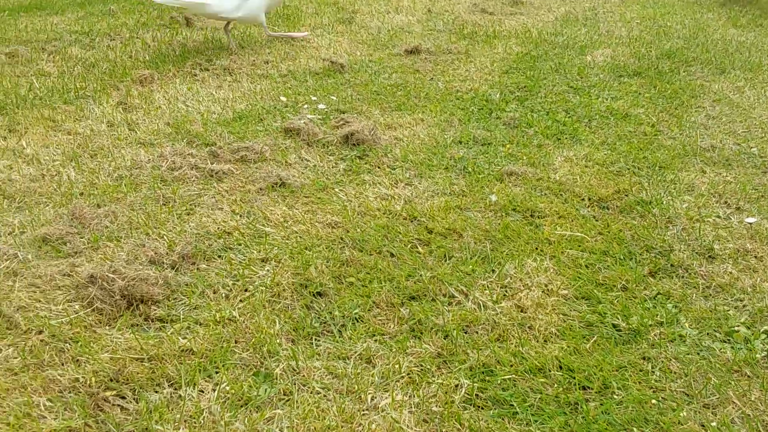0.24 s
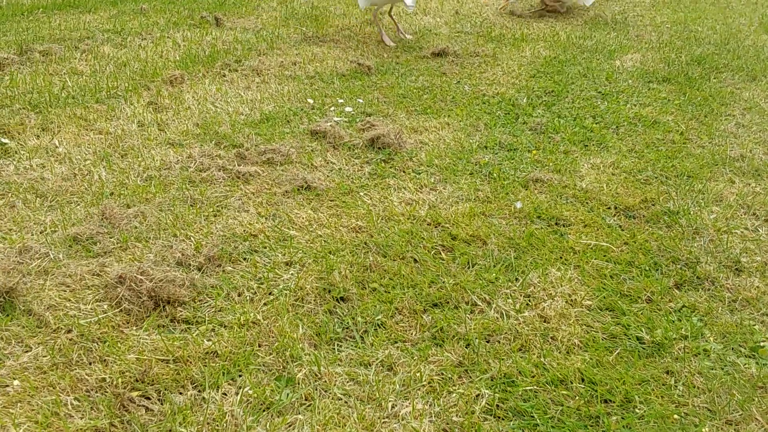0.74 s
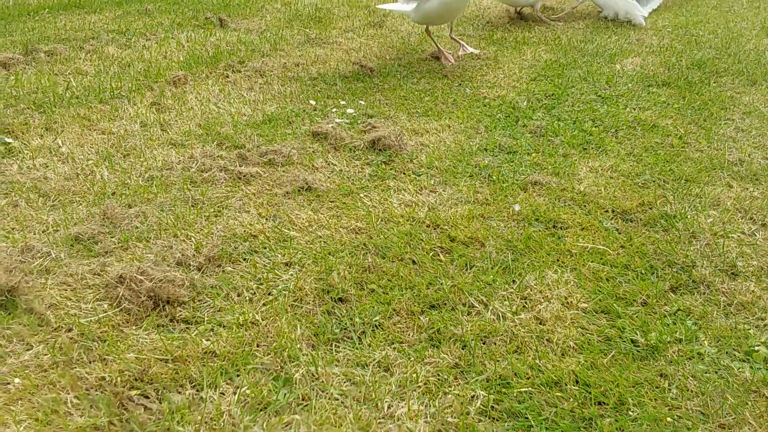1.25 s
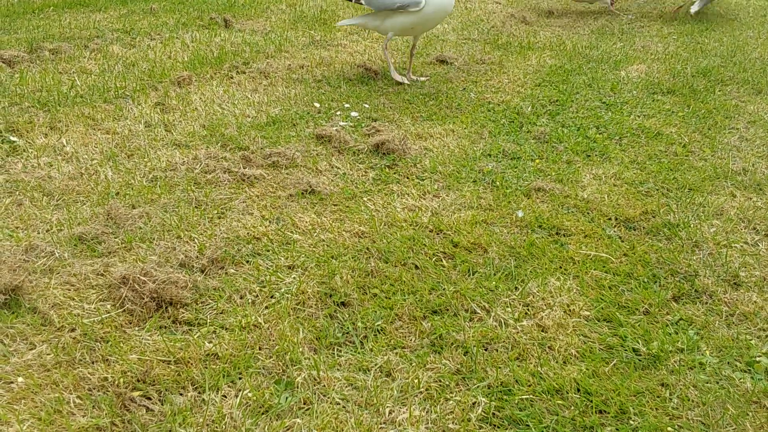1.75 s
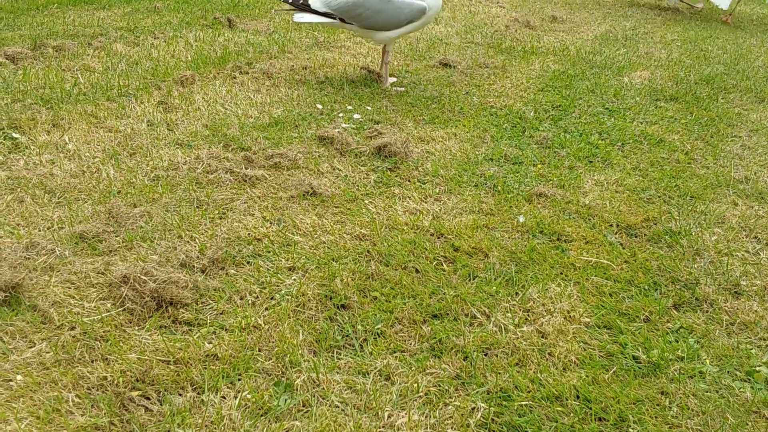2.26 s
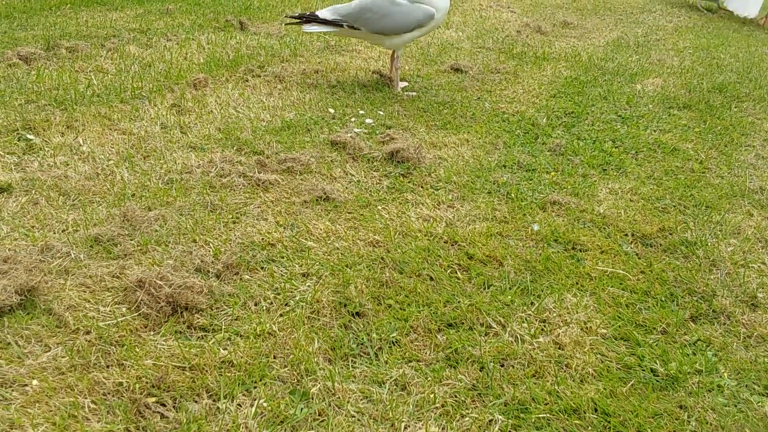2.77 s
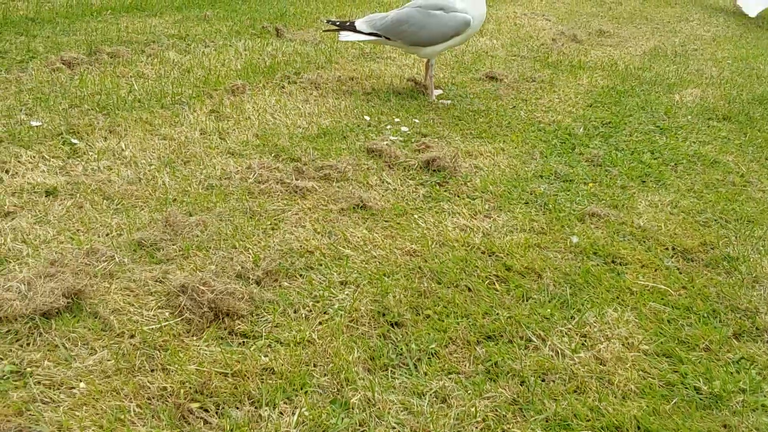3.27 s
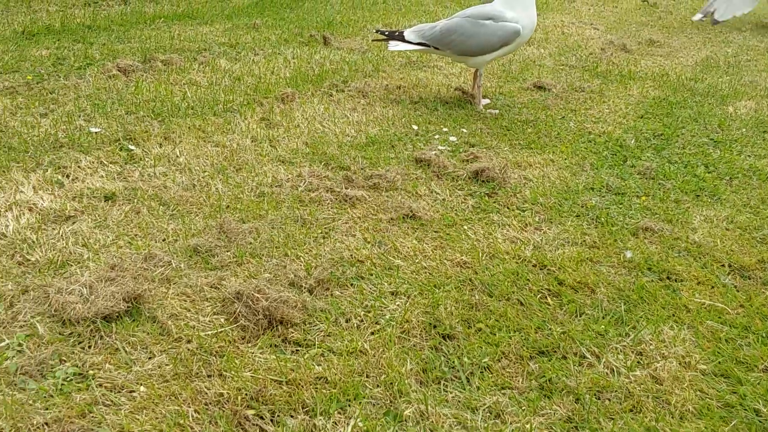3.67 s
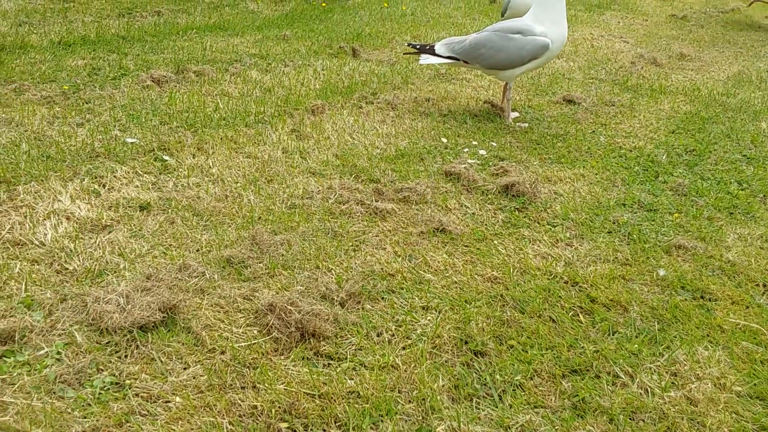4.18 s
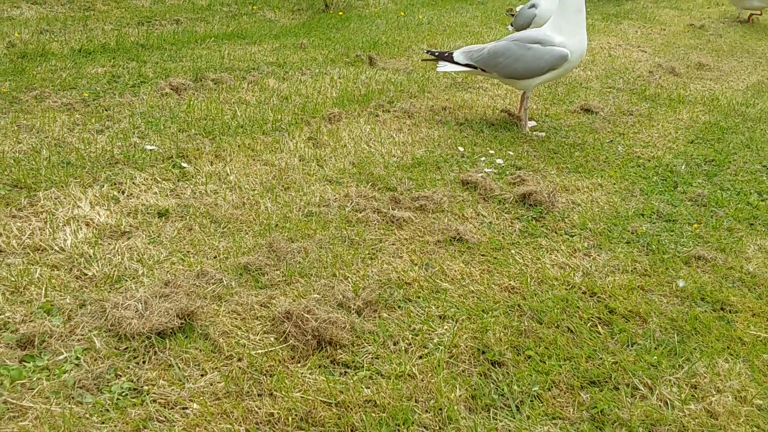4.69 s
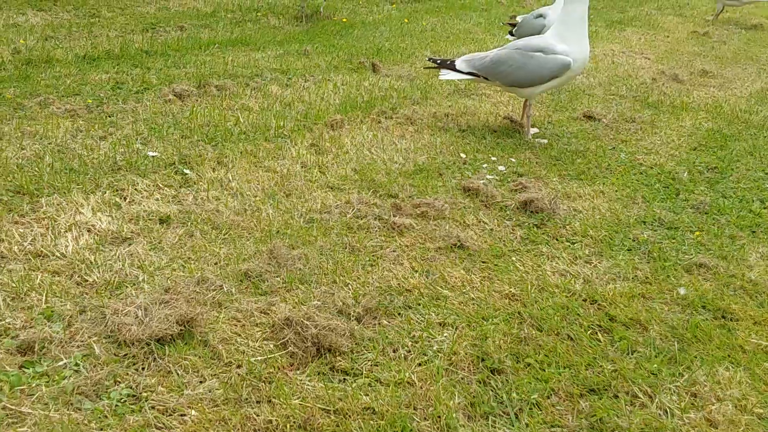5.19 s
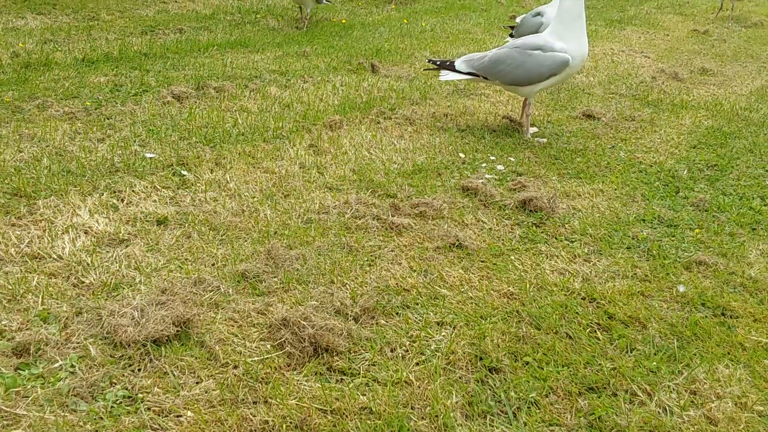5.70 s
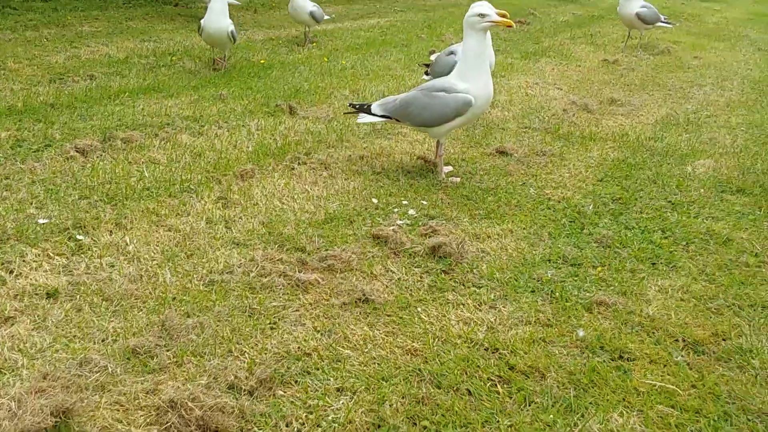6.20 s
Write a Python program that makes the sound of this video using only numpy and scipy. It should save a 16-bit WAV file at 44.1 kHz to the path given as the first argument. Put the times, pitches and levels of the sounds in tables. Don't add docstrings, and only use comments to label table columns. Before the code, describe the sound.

On an open lawn beside a hard wall, soft wing flaps and a faint distant hum lead into a close gull's bright, falling yelps. A second gull answers hoarsely, and others call far off. Breathier wing bursts follow before the fourth cry. Wind then thuds into the handheld stereo microphone, one last near cry rings out, and the scene quiets to a tiny low moan.

```python
import sys
import numpy as np
from scipy import signal
from scipy.fft import rfft, irfft, next_fast_len
from scipy.io import wavfile
from scipy.ndimage import uniform_filter1d

SR = 44100
rng = np.random.default_rng(int(sys.argv[2]) if len(sys.argv) > 2 else 0)


def makeup_ratio(level_db):
    decades = np.asarray(level_db, float) / 20
    return 10 ** decades


def inscribe(sig):
    pcm = np.round(np.clip(np.atleast_2d(sig).T, -1, 1) * 32767)
    wavfile.write(sys.argv[1], SR, pcm.astype(np.int16))


N = 284312
EDGE_HZ = 15900

# (time [s], level [dB], left-right difference [dB])
BREEZE = [(0, -65.5, -4), (1.13, -60.5, 2), (1.63, -54, -6), (2.14, -58.5, -2.5), (3.98, -52, 2),
          (4.2, -50, 1), (4.45, -29, -4), (5.0, -43, 13.5), (5.13, -43, 8), (5.3, -48, 17),
          (5.6, -63.5, 13), (5.89, -83.5, 27), (6.15, -68.5, 6.5), (6.45, -64, 25)]


def evened(x):
    return x / np.sqrt(np.mean(x ** 2, axis=-1, keepdims=True) + 1e-20)


def read(points, hz):
    f, value = np.transpose(points)
    return np.interp(np.log(hz + 1), np.log(f + 1), value)


def curves(rows, t):
    s, *columns = np.transpose(rows)
    return [np.interp(t, s, c) for c in columns]


def add(mix, s, sound):
    part = mix[..., round(s * SR):][..., :sound.shape[-1]]
    part += sound[..., :part.shape[-1]]


def coloured(x, spectrum, lag_ms=0.):
    size = next_fast_len(N + 4096)
    hz = np.fft.rfftfreq(size, 1 / SR)
    delay = np.exp(-2j * np.pi * hz * lag_ms / 1000)
    return irfft(rfft(x, size) * makeup_ratio(read(spectrum, hz)) * delay, size)[..., :N]


def pair(spectrum, same, patchy_db, band):
    left_lag_ms = .5
    a, b = rng.standard_normal((2, N))
    left = np.roll(a, round(left_lag_ms * SR / 1000))
    same = np.clip(same, 0, 1)
    right = same * a + np.sqrt(1 - same ** 2) * b
    hz, t, z = signal.stft(np.array([left, right]), SR, nperseg=512)
    patches = rng.standard_normal(z.shape[:0:-1])
    patches = uniform_filter1d(uniform_filter1d(patches, 6, 0), 12, 1).T
    patchy = signal.istft(z * makeup_ratio(patchy_db * patches / patches.std()), SR, nperseg=512)[1]
    x = coloured(patchy, spectrum)
    inside = signal.sosfilt(signal.butter(4, band, "bandpass", fs=SR, output="sos"), x)
    return x / inside.std()


def rustle(depth_db):
    return makeup_ratio(depth_db * evened(uniform_filter1d(rng.standard_normal(N), 160)))


def air():
    # (time [s], air hiss level [dB])
    background_level = [(0, -62), (.55, -61), (1.1, -64.5), (2, -61), (3.1, -61.5), (3.4, -60.5), (3.75, -56.5),
                        (4.15, -64.5), (5.15, -63), (5.5, -67), (5.8, -76.5), (6.25, -73), (6.447, -68)]
    # (frequency [Hz], density [dB per Hz])
    hiss_spectrum = [(530, -28.5), (900, 7), (1440, 0), (2360, 2), (4100, -1), (7680, 1.5), (10200, -4),
                     (15100, -0.5), (16000, 0)]
    # (frequency [Hz], density [dB per Hz])
    hum_spectrum = [(12, -58), (20, -51.5), (36, -32), (85, 1.5), (124, -2.5), (172, -3), (424, -16.5),
                    (498, -13.5), (742, -14), (1500, -33), (1950, -58), (3300, -120)]
    base_db, follows, usual_hiss_db, wind_mask = -58, 1.5, -63, 0.35
    t = np.arange(N) / SR
    hiss_db, = curves(background_level, t)
    strong_wind_db = np.maximum(curves(BREEZE, t)[0] + 48, 0)
    hum_db = base_db + follows * np.minimum(hiss_db - usual_hiss_db, 3) - wind_mask * strong_wind_db
    hiss = rustle(1.2) * pair(hiss_spectrum, .4, 1.2, (9000, 15000))
    return makeup_ratio(hiss_db) * hiss + makeup_ratio(hum_db) * pair(hum_spectrum, 0.95, 5.0, (250, 900))


def gust():
    # (time [s], level [dB], left-right difference [dB], length [s])
    buffets = [
        (1.286, -50, 8, 0.046),
        (4.287, -40, 10, 0.019),
        (4.427, -27.5, -5, 0.01),
        (4.511, -25, 11, 0.011),
        (4.622, -30, -4, 0.042),
        (4.73, -33, 8, 0.02),
        (4.812, -33.5, -14, 0.045),
        (4.899, -27.5, 0.5, 0.048),
        (5.02, -33.5, -8.5, 0.065),
        (5.185, -37, -1, 0.017),
    ]
    # (frequency [Hz], density [dB])
    rumble = [(12, -65.5), (20, -17.5), (48, 5.5), (85, 5.5), (232, -19), (264, -23), (393, -34.5),
              (576, -44.5), (780, -45), (900, -50), (1170, -101), (1980, -120)]
    t, side = np.arange(N) / SR, np.array([[.5], [-.5]])
    level_db, pan_db = curves(BREEZE, t)
    strength = makeup_ratio(level_db + side * pan_db)
    for s, db, lean_db, length in buffets:
        bump = np.exp(-((t - s) / length) ** 2)
        strength = strength + makeup_ratio(db + side * np.clip(lean_db, -9, 9)) * bump
    lumps = evened(uniform_filter1d(uniform_filter1d(rng.standard_normal((2, N)), 600), 600))
    noise = evened(coloured(rng.standard_normal((2, N)) * makeup_ratio(1.2 * lumps), rumble))
    return noise * strength * makeup_ratio(6)


def wings():
    # (time [s], hiss level [dB], puff relative to hiss [dB], length [s])
    flaps = [(0.039, -54, 10, 0.049), (0.109, -59.5, 18, 0.07), (0.263, -46, 13, 0.043),
             (0.355, -50.5, 6.5, 0.04556), (0.477, -57, 0, 0.025), (0.54, -51.5, 16.5, 0.54),
             (1.258, -52, -6, 0.072), (1.627, -45, 13.5, 0.056), (1.802, -46.5, 4.5, 0.051),
             (1.926, -48.5, -20.5, 0.091), (2.043, -46.5, 4.5, 0.047), (0.849, -34.5, -6, 0.037),
             (2.595, -45.5, 13.5, 0.035), (2.756, -50, 13, 0.095), (2.961, -51.5, 14, 0.041),
             (3.089, -45.5, 13, 0.052), (3.242, -37, 0, 0.095), (3.455, -36, 6, 0.055),
             (3.7815, -36.5, -26, 0.071), (3.92, -44.5, 11.5, 0.044), (3.947, -47.5, -18, 0.22),
             (4.155, -50, 5.5, 0.084), (4.345, -49, -15.5, 0.087), (5.678, -58, -1, 0.086),
             (4.678, -47, 2.5, 0.11), (4.907, -44.5, 10.5, 0.04), (5.006, -48.5, 14, 0.033),
             (5.791, -58.5, -7, 0.093), (5.969, -60, 10, 0.069), (6.015, -62.5, 8.5, 0.056)]
    # (frequency [Hz], density [dB per Hz])
    feather_spectrum = [(760, -30), (1300, 0), (1510, -20), (2270, 1), (5720, -7), (6980, -1),
                        (15200, -11.5), (16000, -10.5)]
    # (frequency [Hz], density [dB per Hz])
    puff_spectrum = [(150, -10.5), (300, -3.5), (600, 6.5), (1000, 2), (1600, -8), (3000, -49)]
    hiss, puff = np.zeros((2, N))
    for s, db, puff_db, length in flaps:
        u = np.arange(round(3 * length * SR)) / SR
        attack = np.minimum(u / (0.014 * length), 1)
        stroke = makeup_ratio(db - 11) * attack * np.exp(-(u / length) ** 2)
        add(hiss, s, stroke)
        add(puff, s, makeup_ratio(puff_db) * stroke)
    feathers = pair(feather_spectrum, .6, 1.2, (9000, 15000))
    return hiss * rustle(1.5) * feathers + puff * pair(puff_spectrum, .7, 1.5, (350, 1200))


def ducking(loud):
    power_db = 10 * np.log10(abs(uniform_filter1d((loud ** 2).mean(0), 600)) + 1e-12)
    release = np.arange(N) * 120.0 / SR
    held_db = np.maximum.accumulate(power_db + release) - release
    over_db = np.maximum(held_db + 24, 0)
    return makeup_ratio(-.35 * uniform_filter1d(over_db, 300))


def wall(x):
    # (left delay [ms], right delay [ms], left level [dB], right level [dB])
    slaps = [
        (31, 33, 0, -7),
        (17.58, 18.8, -17.5, -6.5),
        (4.773, 3.9, -7.5, -7.5),
        (46.4, 69, -20, -27),
        (72.4, 75, -27, -26),
    ]
    # (frequency [Hz], level [dB])
    stone = [(1000, -7.5), (2000, -6), (3500, -1), (6000, -4), (12000, 3)]
    out = np.zeros((2, N))
    for left_ms, right_ms, left_db, right_db in slaps:
        add(out[0], left_ms / 1000, makeup_ratio(left_db) * x)
        add(out[1], right_ms / 1000, makeup_ratio(right_db) * x)
    return coloured(out, stone)


def lawn(x):
    # (frequency [Hz], time to fall 60 dB [s])
    decay = [(300, 0.21), (1500, 0.3), (3000, 0.42), (8000, .35)]
    span = SR // 2
    taps = np.zeros((2, span))
    at = np.arange(400, span - 20, 20) + rng.integers(0, 20, (2, (span - 401) // 20))
    np.put_along_axis(taps, at, rng.choice([-1., 1.], at.shape), 1)
    hz, t, z = signal.stft(taps, SR, nperseg=256)
    tail = signal.istft(z * makeup_ratio(-60 * t / read(decay, hz)[:, None]), SR, nperseg=256)[1]
    return signal.oaconvolve(x[None], tail / np.linalg.norm(tail[0]), axes=1)[:, :N]


def voiced(start, t, hz, effort_db, tone_db):
    return np.transpose([start + t, hz, *(effort_db + db for db in tone_db)])


def glide(start, length, from_hz, to_hz, effort_db, tone_db, swell_db, fade_db, bend=1):
    u = np.linspace(0, 1, num=20)
    hz = from_hz * (to_hz / from_hz) ** (u ** bend)
    level_db = effort_db - swell_db * (1 - u) ** 2 - fade_db * u ** 3
    return voiced(start, u * length, hz, level_db, tone_db)


def moan(start, length, top_hz, effort_db):
    arch_share, tone_db, ends_db = 0.33, (1.5, -17, -6.5), 18.5
    u = np.linspace(0, 1, num=40)
    low = (2 * u - 1) ** 2
    return voiced(start, u * length, top_hz * (1 - arch_share * low), effort_db - ends_db * low, tone_db)


def far_cry(start, length, top_hz, end_hz, effort_db):
    tone_db = (-2.5, -0.5, -7)
    top_at, start_share = .22, .96
    u = np.linspace(0, 1, num=40)
    hz = np.interp(u, [0, top_at, 1], [start_share * top_hz, top_hz, end_hz])
    bright_db = 0.0745 * (top_hz - 1505)
    level_db = effort_db - 8 * (1 - u) ** 8 - 18 * u ** 4
    return voiced(start, u * length, hz, level_db, np.add(tone_db, [0, 0, bright_db]))


def warble(step):
    s, hz, effort_db, open_db = np.transpose(step)
    return voiced(0, s, hz, effort_db, (open_db, 0, open_db - 7))


def near_cry(start, hold, top_hz, effort_db, drop):
    # (best level [dB], at lost share [1],
    # fall per share above [dB], fall per share below [dB], extra level at the break [dB])
    opening = [(1, 0.085, 18.5, 122.5, -3.5), (-13.5, 0.16, 51, 18.5, 6), (-11.5, 0.081, 57.5, 106, 0)]
    break_share, break_s, settle_s = .135, .0065, 0.075
    climb_share, drop_s, sag_per_s = .016, .035, 1.2
    fall_s, close_s, close_share = .195, .045, 0.063
    fade_db_per_s, close_db = 6.5, -3.5
    t = np.arange(0, hold + fall_s, .002)
    fall = t - hold
    closing = np.maximum((fall - fall_s) / close_s + 1, 0)
    sag = drop * np.clip(fall / drop_s, 0, 1) + sag_per_s * np.maximum(fall - drop_s, 0)
    sag += close_share * closing + climb_share * np.maximum(-fall / hold, 0)
    lost = uniform_filter1d(sag, size=6, mode="nearest") + break_share * np.exp(-t / break_s)
    tone = []
    for db, at, above, below, break_db in opening:
        shut_db = above * np.maximum(at - lost, 0) + below * np.maximum(lost - at, 0)
        tone.append(db - shut_db + break_db * np.exp(-t / settle_s))
    tone[2] = tone[2] + 179 * (drop - 0.082)
    level_db = effort_db - fade_db_per_s * t - close_db * closing ** 2
    return voiced(start, t, top_hz * (1 - lost), level_db, tone)


def cry(rows, spectrum, jitter):
    t = np.arange(rows[0][0], rows[-1][0], 1 / SR)
    hz, second_db, first_db, third_db = curves(rows, t)
    slow = uniform_filter1d(uniform_filter1d(rng.standard_normal((2, len(t))), 130), 130)
    wobble, flutter = evened(slow)
    turns = np.cumsum(hz * (1 + jitter * wobble)) / SR
    k = np.arange(1, 13)[:, None]
    level_db = third_db + read(spectrum, k * hz) - read(spectrum, 3 * hz)
    level_db[:2] = first_db, second_db
    partials = makeup_ratio(level_db) * (k * hz < EDGE_HZ) * np.cos(2 * np.pi * k * turns + k * k)
    fade = signal.windows.tukey(len(t), min(.008 * SR / len(t), 1))
    return np.sqrt(2) * partials.sum(0) * (1 + .04 * flutter) * fade


def gulls(cries, spectrum, pan_db, lag_ms, loss_db, jitter, wall_db, lawn_db):
    # (frequency [Hz], left-right difference [dB])
    balance = [(300, -1.5), (1500, 0), (3100, -5), (4400, 5.5), (7000, 8), (9000, -1), (14000, -3.5)]
    voice = np.zeros(N)
    for rows in cries:
        add(voice, rows[0][0], makeup_ratio(loss_db) * cry(rows, spectrum, jitter))
    heard = voice + makeup_ratio(wall_db) * wall(voice) + makeup_ratio(lawn_db) * lawn(voice)
    left = coloured(heard[0], [(hz, (db + pan_db) / 2) for hz, db in balance], lag_ms)
    right = coloured(heard[1], [(hz, -(db + pan_db) / 2) for hz, db in balance])
    return np.array([left, right])


def scene():
    # (start [s], hold [s], top pitch [Hz], effort [dB], share of pitch dropped after the hold [1])
    near = [
        (0.619, 0.072, 1603, -11, 0.09),
        (1.305, 0.053, 1606, -13, 0.089),
        (2.247, 0.049, 1589, -11, 0.091),
        (3.52, .055, 1606, -11.5, .1),
        (5.176, 0.096, 1632, -13, 0.075),
    ]
    # (time [s], pitch [Hz], effort [dB], bill opening [dB])
    hoarse_steps = [
        [(.855, 1732, -22.5, -23), (.875, 1538, -33, 14), (.905, 1495, -22.5, 3.5), (0.936, 1436, -21.5, 0.5),
         (.953, 1273, -13.5, -19)],
        [(.953, 1254, -22, -2), (.97, 1216, -18.5, -0.5), (1.0, 1164, -25.5, -2), (1.052, 1112, -30.5, 0)],
        [(1.052, 1229, -29, -14), (1.085, 1182, -28, -6.5), (1.115, 1092, -35, -47), (1.151, 787, -50, 0)],
    ]
    # (start [s], length [s], top pitch [Hz], end pitch [Hz], effort [dB])
    far = [
        (1.64, 0.1026, 1600, 1345, -62.5),
        (2.63, 0.22, 1533, 1361, -44.5),
        (2.958, 0.13, 1323, 1190, -50.5),
        (3.793, .13, 1409, 1210, -41.5),
        (4.74, 0.1, 1514, 1440, -63),
    ]
    # (start [s], length [s], from pitch [Hz], to pitch [Hz], effort [dB])
    openers = [
        (0.593, 0.03, 401.4, 594, -28),
        (1.279, 0.024, 418, 567, -31),
        (2.222, 0.029, 442, 545, -29),
        (3.445, .056, 426, 564.4, -37.5),
        (3.488, 0.04, 452, 594, -27),
        (5.155, 0.025, 424.7, 598, -27),
    ]
    closers = [
        (1.69, 0.023, 451, 314, -49.5),
        (2.505, 0.035, 494, 324, -46),
        (3.76, 0.035, 449, 334, -46),
        (3.915, 0.0355, 467, 245, -52),
        (5.475, 0.025, 492.7, 339, -48),
    ]
    # (start [s], length [s], top pitch [Hz], effort [dB])
    moans = [
        (0.654, 0.16, 387, -47),
        (1.45, 0.25, 369.2, -34.5),
    ]
    # (start [s], length [s], from pitch [Hz], to pitch [Hz], effort [dB])
    yelps = [
        (2.579, .057, 404, 609, -34),
        (3.046, 0.069, 636, 335.7, -39),
    ]
    mutters = [
        (6.215, 0.035, 235, 216, -65),
        (6.251, 0.05, 225, 280, -63.5),
        (6.297, 0.049, 262, 309, -57),
    ]
    last_moan = [
        (6.345, .1, 322, 362, -48),
    ]
    yelp_tone_db = (-5, 0, -27)
    last_tone_db = (1.5, -19, -4.5)
    open_tone_db, close_tone_db, mutter_tone_db = (0, -16, -17.5), (3, -12.5, -6), (-4, -18, 0)
    # (frequency [Hz], level [dB])
    bill = [(3200, 12), (4600, 1.5), (6300, -13.5), (8000, -19.5), (11000, -27.5), (15000, -35.5)]
    # (frequency [Hz], level [dB])
    hoarse = [(3200, 0), (4600, -0.5), (6100, -21), (7500, -6.5), (9000, -17), (11000, -28.5), (15000, -27)]
    # (frequency [Hz], level [dB])
    throat = [(1000, 17.5), (1500, -11), (2150, -5), (2500, -4), (2850, -6), (3500, -7.5), (7000, -29)]
    pans_db = [0, -3, -3, 0, 0]
    lags_ms = [.51, .17, .17, .22, .4]
    # (distance gain [dB], pitch jitter [share], wall level [dB], lawn level [dB])
    places = [
        (-4.5, 0.0038, 3.5, -16),
        (2, 0.009, -9, -12.5),
        (-2, 0.0028, 4.5, -14.5),
        (5, 0.055, -5.5, -6),
        (2.26, 0.02, -18, -15.5),
    ]

    low = [glide(*row, open_tone_db, 13.5, 1) for row in openers]
    low += [glide(*row, close_tone_db, 5.5, 20) for row in closers]
    soft = [moan(*row) for row in moans]
    soft += [glide(*row, yelp_tone_db, 10.7, 9.5, .7) for row in yelps]
    soft += [glide(*row, mutter_tone_db, 4.7, 4.4) for row in mutters]
    soft += [glide(*row, last_tone_db, 9.4, 3, .5) for row in last_moan]
    clear = [near_cry(*row) for row in near]
    warbled = [warble(step) for step in hoarse_steps]
    distant = [far_cry(*row) for row in far]
    cries = clear, warbled, distant, low, soft
    spectra = bill, hoarse, bill, throat, throat
    birds = np.zeros((2, N))
    for group, spectrum, pan_db, lag_ms, place in zip(cries, spectra, pans_db, lags_ms, places):
        birds = birds + gulls(group, spectrum, pan_db, lag_ms, *place)
    return birds + ducking(birds) * (wings() + air()) + gust()


def roll_off(x):
    return signal.sosfilt(signal.butter(12, 16760, fs=SR, output="sos"), x)


def record(dry):
    held = .8 * np.tanh(dry / .8)
    edge = signal.firwin(255, EDGE_HZ, window=("kaiser", 9), fs=SR)
    mix = signal.oaconvolve(held, edge[None], "same")
    return roll_off(mix)


dry = scene()
out = record(dry)
inscribe(out)
```